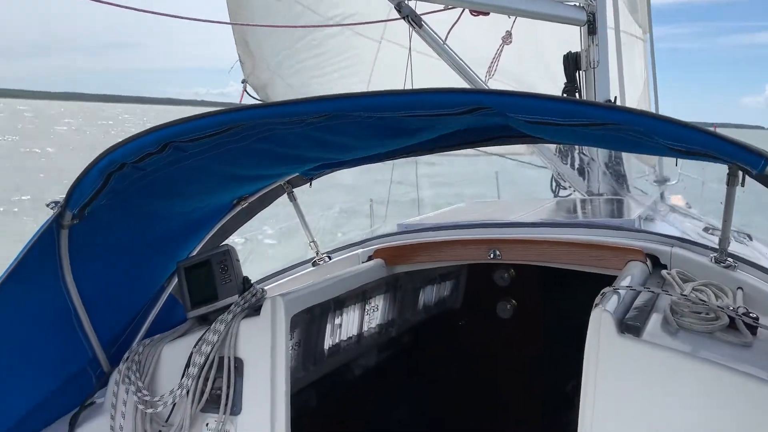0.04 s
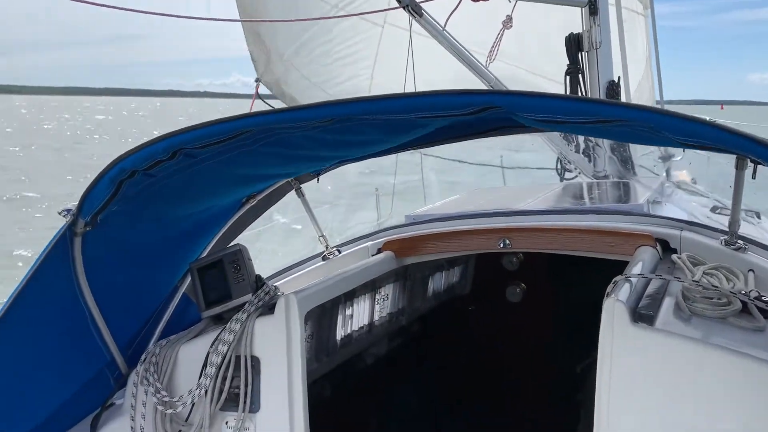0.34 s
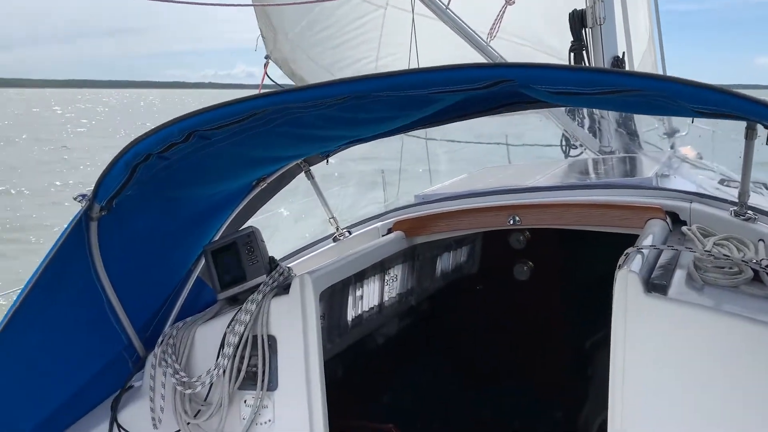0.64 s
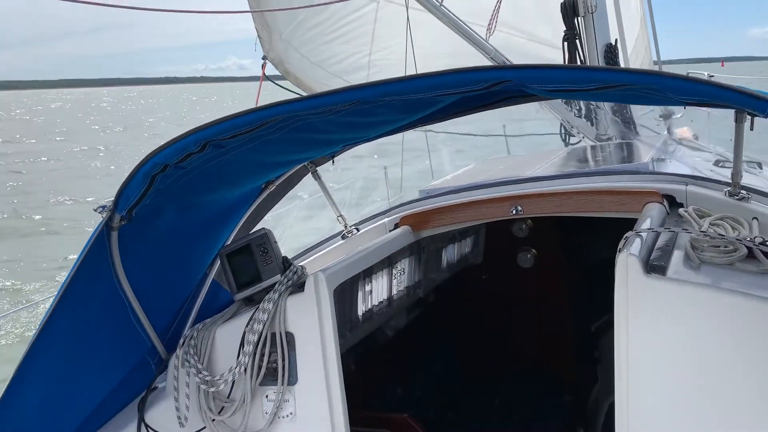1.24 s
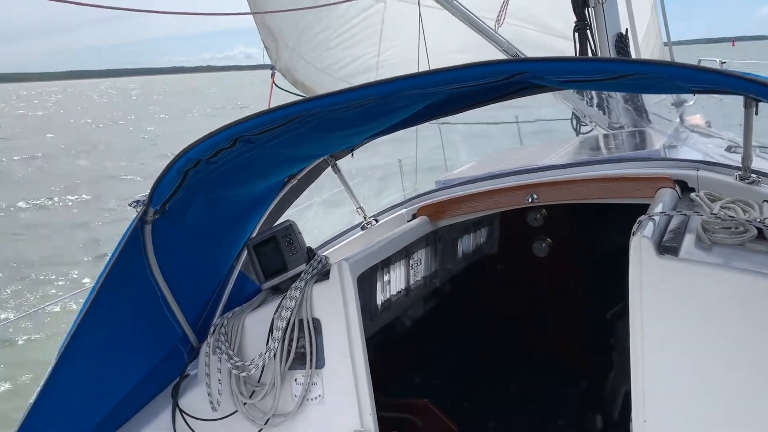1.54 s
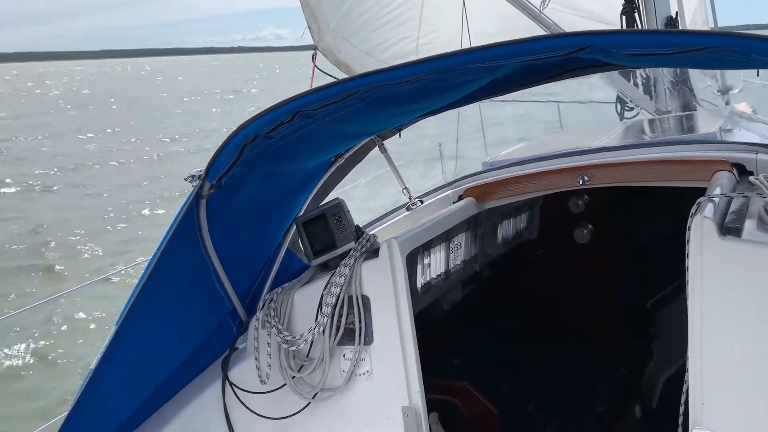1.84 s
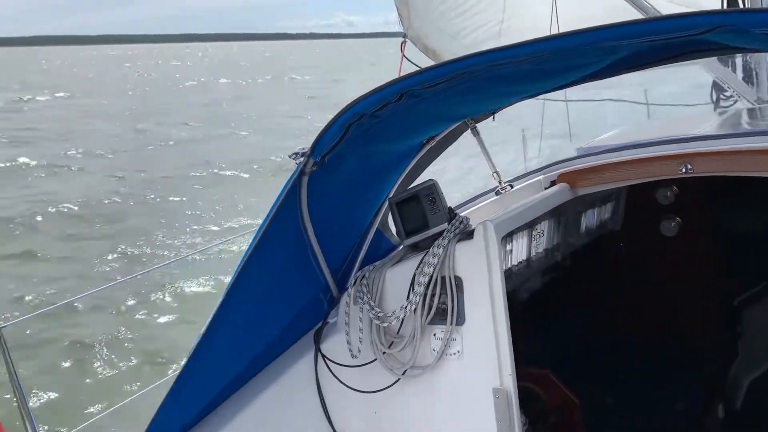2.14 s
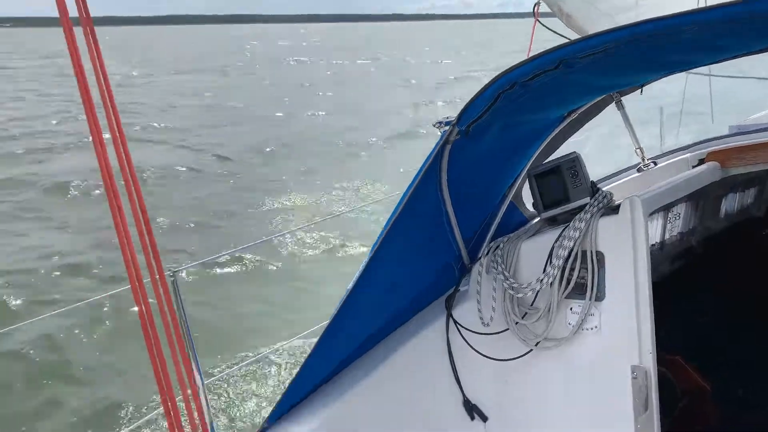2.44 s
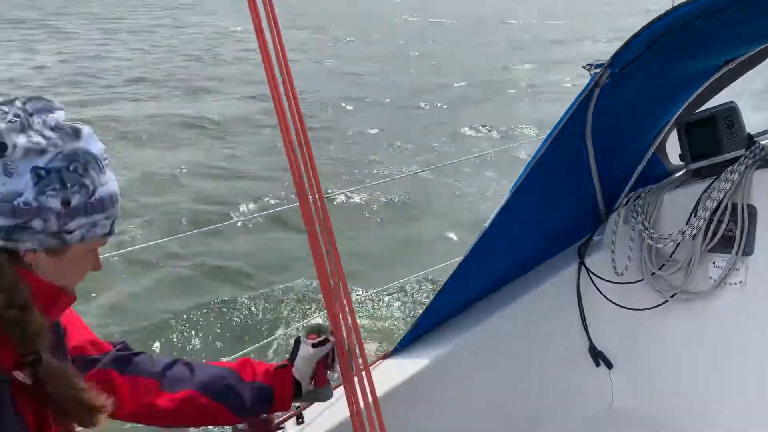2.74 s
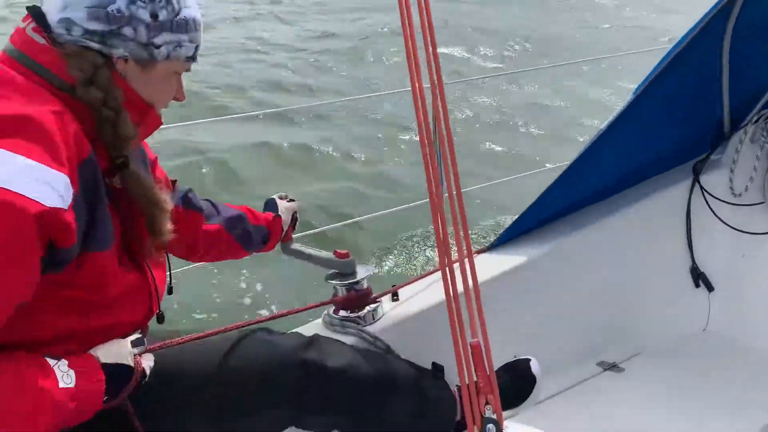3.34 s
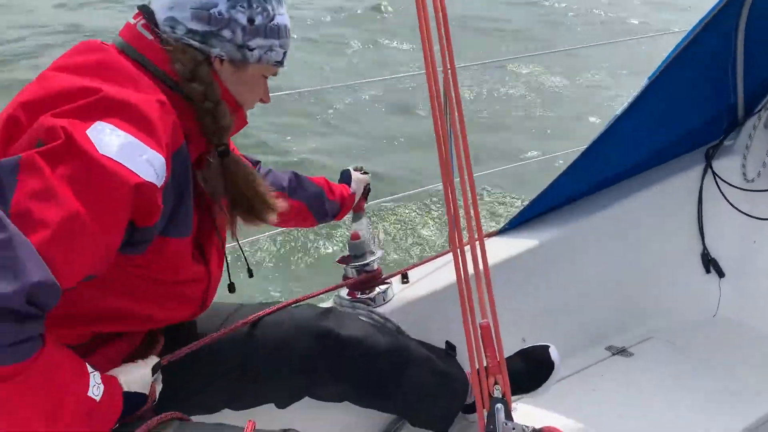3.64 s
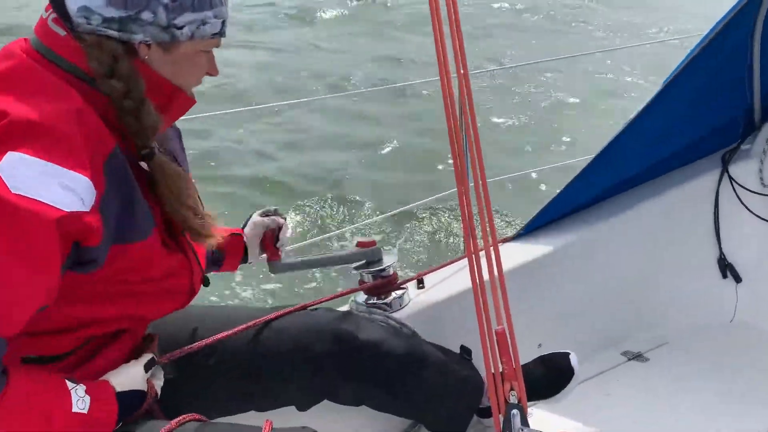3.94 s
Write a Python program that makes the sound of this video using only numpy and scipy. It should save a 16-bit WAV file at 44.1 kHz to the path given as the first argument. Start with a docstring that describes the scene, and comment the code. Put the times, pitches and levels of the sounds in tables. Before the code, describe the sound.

A sailboat winch ratchets close by, first with a few scattered clicks, then in quicker metallic runs with dry ticks between. Gusts rumble and pop on the microphone in the open cockpit while water hisses softly.

```python
"""Cranking a winch under sail

A rope winch is cranked back and forth in a yacht's cockpit. On one stroke its pawls (small catches)
snap onto the teeth and ring the metal drum; on the return they tick, dry and bright. The handle knocks
and the rope creaks. Gusts of wind buffet the microphone, over the hiss of water along the hull."""
import sys
import numpy as np
from scipy import signal
from scipy.fft import rfft, irfft
from scipy.io import wavfile
from scipy.ndimage import uniform_filter1d

SR = 44100
rng = np.random.default_rng(int(sys.argv[2]) if len(sys.argv) > 2 else 0)


def unload_wav(signal):
    """Save mono or channel-first audio to the path in sys.argv[1] as 16-bit WAV at rate SR, clipped to [-1, 1]."""
    wavfile.write(
        sys.argv[1],
        SR,
        np.round(np.clip(np.atleast_2d(signal).T, -1, 1) * 32767).astype(np.int16),
    )


N = 176400  # 4 seconds
SIDES = np.array([[1], [-1]])  # adds a signal on the left and subtracts it on the right

# Pawls landing. Each row: start in seconds, ring level in dB, snap level in dB, favoured pitch in Hz.
# Levels in all tables are relative: the functions set the final balance.
PAWL_CLICKS = [(0.477, -38, -49, 5090), (0.6303, -33.5, -49.5, 5170), (0.725, -33, -51, 5040),
               (1.4598, -33, -47.5, 4820), (1.5228, -33, -47, 4880), (1.563, -31, -47, 4840),
               (1.599, -36, -47.5, 4830), (1.641, -38, -46.5, 4830), (1.694, -29, -46, 5220),
               (1.755, -38, -40, 5060), (1.8133, -44, -40.5, 5020), (1.875, -36.5, -45, 4840),
               (2.8966, -32, -43.5, 5190), (2.9379, -33, -46, 5330), (2.969, -45, -45, 4990),
               (2.996, -40, -47.5, 4820), (3.02, -40, -52, 5130), (3.0438, -35, -50, 5010),
               (3.0677, -39.5, -47, 4860), (3.092, -33, -50.5, 5150), (3.12, -34, -48.5, 5190),
               (3.154, -35.5, -49, 5230), (3.186, -36, -50, 5330), (3.2144, -39, -46.5, 5160),
               (3.2422, -30.5, -46, 5200), (3.275, -34, -44, 5280), (3.316, -37, -46, 5490),
               (3.3557, -34, -44.5, 5370), (3.3921, -37.5, -38.5, 4950), (3.4258, -29, -40.5, 5240),
               (3.4604, -30.5, -45, 5040), (3.503, -36.5, -49.5, 5060)]
# The drum's natural tones. Each row: pitch in Hz, level in dB, seconds to fade by 60 dB.
DRUM_TONES = [(4926,8.5,0.039),(4930,-3,0.073),(5146,1,0.031),(5315,-1,0.042),(5900,4,0.02),(6570,0.5,0.02),(7720,4,0.047),(7400,-8.5,0.036),(9600,-2.5,0.064),(10590,5,0.014),(10660,-1,0.033),(13140,12,.025),(12680,11.5,0.023),(13300,4,0.02),(14800,-15,.02)]
# The snap's colour (its mix of low and high sound). Each row: frequency in Hz, level in dB.
SNAP_COLOUR = [(1200,4.5),(2500,2),(3600,4.5),(4250,14),(5200,13),(6600,7),(9000,5.5),(12300,13.5),(13600,-2),(14800,-12),(16000,8)]
def ringing_pawls():
    """Each pawl snaps onto a tooth and rattles; every contact rings the drum, a little differently each time."""
    focus_db, focus_width_hz = 18, 200  # each click favours the low tones near its own pitch
    detune, scatter_db = 0.0048, 3  # how much the tones change from tooth to tooth
    hz, db, fade_s = np.array(DRUM_TONES).T[:, :, None]
    t = np.arange(SR // 10) / SR
    low, high = np.zeros(N), np.zeros(N)
    is_low = hz[:, 0] < 6800  # low tones follow the ring level, high ones the snap level
    for at, ring_db, snap_db, centre_hz in PAWL_CLICKS:
        focus = undb(focus_db * (np.exp(-((hz - centre_hz) / focus_width_hz) ** 2) - 1))
        louder, sharper = rng.standard_normal((2, len(DRUM_TONES), 1))
        pitch = hz * (1 + detune * sharper * fade_s.min() / fade_s)  # short tones shift the most
        fade = np.exp(-np.log(1000) * t / fade_s)
        ring = undb(db + scatter_db * louder) * fade * np.sin(2 * np.pi * pitch * t)
        tones = signal.fftconvolve(ring, pawl_contacts(len(t))[None], axes=1)[:, :len(t)]
        tones *= ring.std(axis=1, keepdims=True) / tones.std(axis=1, keepdims=True)  # keep each level
        add(low, at, undb(ring_db - 9) * (focus * tones)[is_low].sum(0))
        add(high, at, undb(snap_db - 8) * tones[~is_low].sum(0))
    rattle = even(undb(7.5 * wander(per_s=1100)), span_s=0.0027)
    snaps = [(at, snap_db) for at, _, snap_db, _ in PAWL_CLICKS]
    envelope = bursts(snaps, rise_s=0.0004, decay_s=0.0033, tail_db=-5, tail_s=0.012)
    snap = undb(3) * wide_noise(SNAP_COLOUR) * rattle * envelope
    return low * undb(-3.25 * SIDES) + high + snap  # the low tones sit to the right


def pawl_contacts(samples):
    """One pawl grazes the tooth, lands and bounces; the cockpit throws back a scatter of echoes."""
    mean_gap_s, contact_db = 0.0017, (-7, -4, -8.5, -12)
    gaps = mean_gap_s * (0.5 + rng.random(size=len(contact_db)))
    echo_s = rng.uniform(0.0046, 0.029, size=16)
    times = np.concatenate([np.cumsum(gaps) - gaps[0], echo_s])
    strengths = np.concatenate([undb(contact_db), undb(-11) * np.exp(-echo_s / 0.011)])
    hits = np.zeros(samples)
    np.add.at(hits, np.clip(times * SR, 0, samples - 1).astype(int), strengths)
    return hits


# Ticks of the return stroke. Each row: start in seconds, level in dB.
DRY_TICKS = [(0.837, -48), (2.1256, -41.5), (2.1834, -37), (2.2319, -35), (2.2788, -36.5), (2.3708, -36),
             (2.4508, -35.5), (2.5054, -38.5), (2.5496, -39.5), (2.589, -39), (2.6274, -39),
             (2.6725, -40.5), (2.7861, -44), (2.804, -44), (3.7529, -39.5), (3.8083, -41), (3.8492, -39),
             (3.8826, -40.5), (3.913, -39), (3.9415, -36), (3.9757, -33)]
# Their bright colour. Each row: frequency in Hz, level in dB.
TICK_COLOUR = [(1500,-11),(3500,5.5),(5500,-1),(7000,0.5),(8100,2.5),(9200,0.5),(10900,1),(11600,4.5),(12500,0),(13300,4),(14700,-5),(16000,5.5)]
def dry_pawls():
    """On the return stroke the pawls tick with hardly any ring."""
    envelope = bursts(DRY_TICKS, rise_s=0.00045, decay_s=0.0011, tail_db=-3.5, tail_s=0.0073)
    return undb(-6.5) * wide_noise(TICK_COLOUR) * envelope


# Knocks of the handle and rope. Each row: start in seconds, level in dB.
KNOCKS = [(.924,-50.5),(1.113,-51.5),(1.252,-52),(2.008,-49),(2.185,-50.5),(2.371,-55),(2.590,-58),(2.604,-62),(2.806,-46),(2.815,-48),(2.891,-64),(2.977,-51),(3.020,-49),(3.605,-50),(3.630,-44),(3.639,-48.5)]
# Their duller colour. Each row: frequency in Hz, level in dB.
KNOCK_COLOUR = [(600,-20),(1500,-1),(2600,5.5),(4000,4.5),(5200,-3.5),(7500,-4),(15000,-14)]
def handle_knocks():
    """Handle and rope knock as the load changes, a little to the right."""
    envelope = bursts(KNOCKS, rise_s=0.00097, decay_s=0.003, tail_db=-7, tail_s=0.016)
    return undb(-2) * noise(KNOCK_COLOUR) * envelope * undb(-1.2 * SIDES)


# Creaks of the loaded rope. Each row: start in seconds, length in seconds, pitch in Hz, level in dB.
CREAKS = [(2.80,0.049,2290,-47.5),(3.702,0.031,2300,-61),(3.75,.036,2120,-51)]
def rope_creaks():
    """The rope slips in quick uneven steps; each rings briefly, and later ones are a little lower."""
    slips_per_s, ring_s, pitch_drop = 420, 0.0024, 0.07
    out, t = np.zeros(N), np.arange(SR // 50) / SR
    for at, length, hz, db in CREAKS:
        for progress in rng.uniform(0, 1, max(int(length * slips_per_s), 1)):
            pitch = hz * (1 + pitch_drop * (0.5 - progress))
            ring = np.sin(2 * np.pi * pitch * t) * np.exp(-t / ring_s)
            add(out, at + progress * length, undb(db) * ring)
    return out


# The wind's base level. Each row: time in seconds, then low rumble, middle flutter and high rasp in dB.
WIND_LEVELS = [(0,-41.5,-46.5,-57),(.36,-39,-47,-55.5),(.44,-36,-50,-46.5),(.6,-29,-38,-69),(0.721,-37.5,-38.5,-47),(.74,-26,-30,-40),(1.05,-27.5,-31.5,-44),(1.29,-34.5,-33,-41.5),(1.35,-30,-34,-63.5),(1.5,-32,-41,-47.5),(1.66,-27,-34.5,-49.5),(1.83,-28,-31.5,-45.5),(1.93,-25.5,-32,-37.5),(2.1,-27,-32,-45),(2.22,-25,-33.5,-40.5),(2.3,-27,-47,-48),(2.42,-28.5,-36,-45.5),(2.58,-22.5,-34.5,-42.5),(2.66,-33.5,-41,-42),(2.78,-29,-37.5,-50),(2.95,-28.5,-39,-47),(3.07,-29.5,-40,-45.5),(3.28,-27.5,-39,-48),(3.42,-27,-32.5,-42),(3.55,-29,-45,-47.5),(3.72,-29.5,-37,-52.5),(3.79,-35.5,-45,-59),(3.87,-31.5,-34.5,-45),(4,-24,-30.5,-43)]
# Single shoves of wind. Each row: time of the peak in seconds, then rumble, flutter and rasp in dB.
BUFFETS = [(0.042,-32.5,-39,-67),(0.184,-55,-40.5,-45),(0.406,-31,-39.5,-62),(.475,-28.5,-41,-48),(.548,-24.5,-31.5,-52),(0.754,-22,-24,-46),(.788,-39,-25,-44),(0.834,-27,-28,-53),(.9,-34,-39,-45),(0.925,-38,-28.5,-33),(1.013,-36,-40,-36.5),(1.045,-23,-27,-40.5),(1.125,-46,-39,-40.5),(1.154,-28,-31,-53),(1.2,-38,-30.5,-60),(1.297,-24,-33,-47),(1.882,-35,-43,-40),(1.981,-40,-25,-46),(2.023,-37,-29,-39),(2.134,-47,-40,-39.5),(2.341,-25,-36,-61),(2.377,-23,-30,-39.5),(2.506,-27,-41,-36.5),(2.562,-31,-26.5,-34),(2.601,-21.5,-27.5,-35),(2.699,-24,-39.5,-37),(2.727,-22.5,-55,-64),(2.815,-26,-25,-28),(2.895,-37,-35,-34.5),(2.984,-40,-30.5,-36),(3.022,-26,-30,-31),(3.162,-25.5,-34,-44),(3.352,-24.5,-37,-42),(3.4,-29,-47,-45),(3.446,-22.5,-35,-37),(3.515,-29,-30,-42),(3.579,-29,-31.5,-50),(3.657,-27,-34.5,-45),(3.861,-24,-31.5,-41.5),(3.944,-25.5,-35,-37.5),(3.995,-34,-33,-29.5)]
# The wind's deep colour. Each row: frequency in Hz, level in dB.
WIND_COLOUR = [(20,-6.5),(32,-19),(48,-2),(68,3),(100,-1),(160,-4),(250,-7),(400,-9.5),(550,-15.5),(750,-22.5),(1000,-24),(1400,-32),(2000,-39.5),(3000,-54),(5000,-58),(9000,-87)]
def wind():
    """Air swirls at the microphone: rumble, flutter and rasp swell in buffets and partly share eddies."""
    rumble_top_hz, flutter_top_hz, buffet_half_s = 234.4, 731, 0.011
    bands = below(rumble_top_hz), above(rumble_top_hz) * below(flutter_top_hz), above(flutter_top_hz)
    balance_db, width_db = (-1, -0.5, -5.5), (-36, -2, 0)  # for rumble, flutter, rasp
    eddy_db, gust_db = (3.5, 4, 4), (1.06, 1.3, 1.7)  # depth of the quick and the slower swings
    t = np.arange(N) / SR
    base, buffets = np.array(WIND_LEVELS), np.array(BUFFETS)
    swells = np.exp(-((t - buffets[:, :1]) / buffet_half_s) ** 2)
    eddies, gusts, out = wander(per_s=110), wander(per_s=22), 0
    for k, band in enumerate(bands):
        base_power = undb(np.interp(t, base[:, 0], base[:, k + 1])) ** 2
        buffet_power = undb(buffets[:, k + 1]) ** 2 @ swells
        level = undb(balance_db[k]) * np.sqrt(base_power + buffet_power)
        mid = even(noise(WIND_COLOUR, band), span_s=0.0299)
        side = undb(width_db[k]) * noise(WIND_COLOUR, band)
        swirl = (eddies + wander(per_s=110)) / np.sqrt(2)
        churn = even(undb(eddy_db[k] * swirl), span_s=0.029)
        surge = even(undb(gust_db[k] * gusts), span_s=0.19)
        out = out + level * surge * churn * (mid + side * SIDES)
    return out


# Sharp pops of wind. Each row: start in seconds, thud level in dB, crack level in dB.
POPS = [(0.537, -22.5, -50), (0.558, -22.5, -38.5), (0.728, -38, -34.5), (0.741, -28, -28),
        (0.75, -23, -22), (0.781, -29, -34), (0.829, -22.5, -42), (0.903, -20, -36), (0.92, -30, -36.5),
        (0.947, -27, -49.0), (1.046, -23, -40), (1.145, -23, -35), (1.286, -28, -38), (1.297, -24, -34.5),
        (1.399, -39, -41.5), (1.561, -20.5, -46), (1.79, -21, -37.5), (1.873, -20.5, -29.5),
        (1.928, -39, -31.5), (1.973, -22, -34), (2.016, -19, -30), (2.078, -27, -43), (2.132, -40.5, -36),
        (2.166, -32.0, -34), (2.186, -29, -29), (2.333, -29, -36), (2.371, -20, -36), (2.503, -28, -28.5),
        (2.544, -33, -30), (2.591, -28, -28.5), (2.604, -34, -29), (2.689, -26.5, -32), (2.781, -41, -34),
        (2.802, -38, -32.5), (2.81, -26.5, -25), (2.819, -38, -23), (2.893, -35.0, -39), (3.022, -26, -29),
        (3.36, -25.5, -35), (3.448, -41, -28.5), (3.859, -39, -35)]
# The colours of the thud and the crack. Each row: frequency in Hz, level in dB.
THUD_COLOUR = [(70,3),(150,-3.5),(330,0),(480,-4.5),(700,-19),(3000,-78)]
CRACK_COLOUR = [(300,-22),(500,1.5),(900,4),(1300,-16),(2200,-17.5),(3500,-39),(6000,-46),(12000,-58)]
def wind_pops():
    """Eddies (small swirls of air) break on the microphone, each a mix of low thud and dull crack."""
    thuds, cracks = [(at, db) for at, db, _ in POPS], [(at, db) for at, _, db in POPS]
    thud = even(noise(THUD_COLOUR), span_s=0.0085)
    thud *= bursts(thuds, rise_s=0.00087, decay_s=0.0032, tail_db=-22, tail_s=0.0046)
    crack = even(wide_noise(CRACK_COLOUR), span_s=0.0019)
    crack *= bursts(cracks, rise_s=0.00077, decay_s=0.0021, tail_db=-15.5, tail_s=0.0059)
    return undb(-0.5) * thud + undb(-1.5) * crack


# How loud the water is. Each row: time in seconds, level in dB.
WATER_LEVELS = [(0,-58),(.14,-53.5),(.2,-49.5),(.48,-51),(.6,-56),(.72,-54),(.81,-69),(.85,-52),(.97,-65),(1.15,-63),(1.2,-58),(1.29,-54.5),(1.36,-60),(1.6,-50.5),(1.85,-60),(2.1,-63.5),(2.45,-61),(2.65,-58),(2.75,-67),(3.3,-56),(3.68,-59.5),(3.79,-64),(4,-61.5)]
# The water's colour. Each row: frequency in Hz, level in dB.
WATER_COLOUR = [(200,12),(330,20),(600,-17),(1100,7.5),(1500,-0.5),(2000,3.5),(3300,1.5),(4500,-2.5),(6500,-2),(8300,-14.5),(10000,-4),(13000,-9.5),(16000,-10)]
def water():
    """Water washes along the hull: a flickering hiss, widest in its middle pitches."""
    at, db = np.array(WATER_LEVELS).T
    mid = noise(WATER_COLOUR)
    side = undb(-1.5) * noise(WATER_COLOUR, above(hz=980) * below(hz=3700, order=1))
    flicker_db = 1.9 * wander(per_s=22.5)
    return undb(np.interp(np.arange(N) / SR, at, db) + flicker_db) * unit(mid + side * SIDES)


def microphone_hiss():
    """The microphone adds its own faint, steady, high hiss."""
    colour = [(2000, -14), (6000, -11), (8300, 1), (11000, 2.5), (13500, 2), (16000, -15)]
    return undb(-70.5) * noise(colour)


def undb(db):
    """Turn decibels into a number to multiply by."""
    return 10 ** (np.asarray(db) / 20)


def unit(x):
    """Scale a signal to an average level (rms) of 1."""
    return x / np.sqrt(np.mean(x ** 2))


def even(x, span_s):
    """Hold the level near 1 over a span, keeping only the quicker changes."""
    return x / np.sqrt(uniform_filter1d(x ** 2, max(int(span_s * SR), 2)) + 1e-9)


def noise(colour, band=1):
    """Noise at level 1, coloured by (Hz, dB) points and an optional filter."""
    hz, db = np.array(colour).T
    f = np.maximum(np.fft.rfftfreq(N, 1 / SR), 1)
    gain = undb(np.interp(np.log(f), np.log(hz), db))
    return unit(irfft(rfft(rng.standard_normal(N)) * band * gain, N))


def wide_noise(colour):
    """Noise with a little stereo width, as from echoes in the cockpit."""
    return noise(colour) + undb(-8) * noise(colour) * SIDES


def below(hz, order=6):
    """A filter curve that keeps the lows; a higher order cuts more steeply."""
    return 1 / np.sqrt(1 + (np.fft.rfftfreq(N, 1 / SR) / hz) ** (2 * order))


def above(hz, order=6):
    """The matching curve that keeps the highs."""
    return np.sqrt(1 - below(hz, order) ** 2)


def wander(per_s):
    """Smooth random motion of typical size 1."""
    step = max(int(SR / per_s), 2)
    stairs = np.repeat(rng.standard_normal(N // step + 1), step)
    return unit(uniform_filter1d(stairs, step)[:N])


def add(track, at, sound):
    """Mix a sound into a track at a time in seconds."""
    i = int(np.clip(at * SR, 0, N - 1))
    track[i:i + len(sound)] += sound[:N - i]


def bursts(rows, rise_s, decay_s, tail_db, tail_s):
    """Loudness over time for (seconds, dB) blows: a short crack, then its scatter round the cockpit."""
    t = np.arange(SR // 5) / SR
    rise = (1 - np.exp(-t / rise_s)) ** 2
    shape = rise * (np.exp(-t / decay_s) + undb(tail_db) * np.exp(-t / tail_s))
    power = np.zeros(N)
    for at, db in rows:
        add(power, at, (undb(db) * shape / shape.max()) ** 2)
    return np.sqrt(power)


def scene():
    """Winch, rope, wind and water together, over the microphone's own hiss."""
    winch = ringing_pawls() + dry_pawls() + handle_knocks() + rope_creaks()
    return winch + wind() + wind_pops() + water() + microphone_hiss()


def record(dry):
    """The phone's processing centres the bass, widens the treble, rounds peaks, trims lows and highs."""
    widens_s, lag_s, ceiling = (1.71, 2.7), 0.0002337, 0.21
    f = np.fft.rfftfreq(N, 1 / SR)
    t = np.arange(N) / SR
    dry = dry * np.clip(np.minimum(t, t[-1] - t) / 0.003, 0, 1)  # quick fade in and out
    mid, side_spectrum = (dry[0] + dry[1]) / 2, rfft(dry[0] - dry[1]) / 2
    narrow = irfft(side_spectrum * above(hz=990, order=10), N)
    wide = irfft(side_spectrum * above(hz=560, order=3), N)
    opened = np.interp(t, widens_s, (0, 1))  # the stereo width spreads down to lower pitches
    side = (1 - opened) * narrow + opened * wide
    # In the treble, left and right swing opposite ways and slightly apart in time.
    phase = above(hz=3680) ** 2 * (np.pi - 2 * np.pi * f * lag_s)
    spectrum = rfft(mid + side * SIDES) * above(hz=33.8, order=3)
    stereo = irfft(spectrum * np.exp(1j * phase * SIDES / 2), N)
    rounded = stereo / (1 + (stereo / ceiling) ** 4) ** (1 / 4)
    return irfft(rfft(rounded) * below(hz=15850, order=60), N)


dry = scene()
out = record(dry)
unload_wav(out)
```